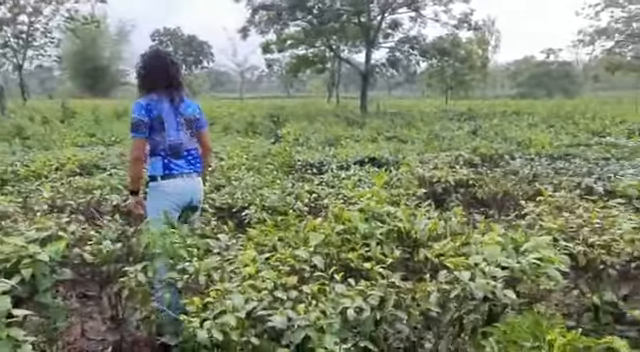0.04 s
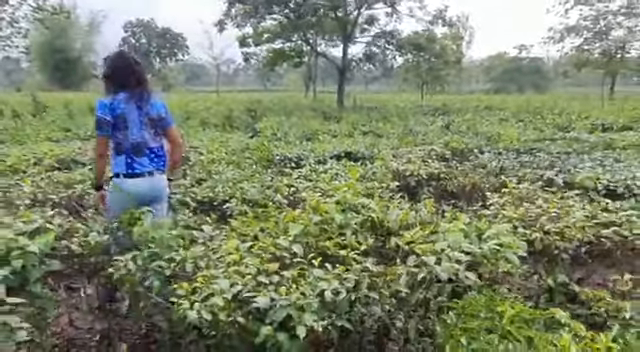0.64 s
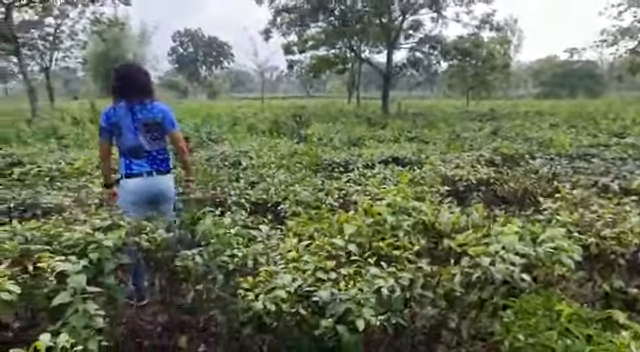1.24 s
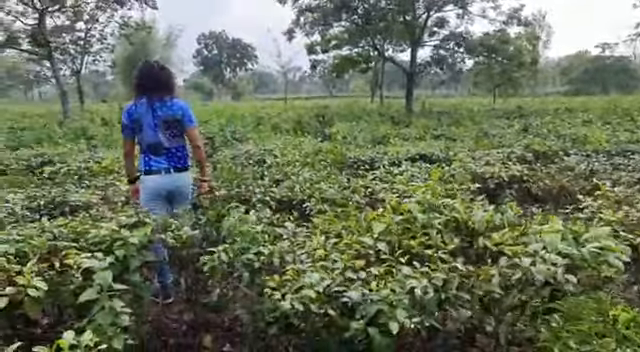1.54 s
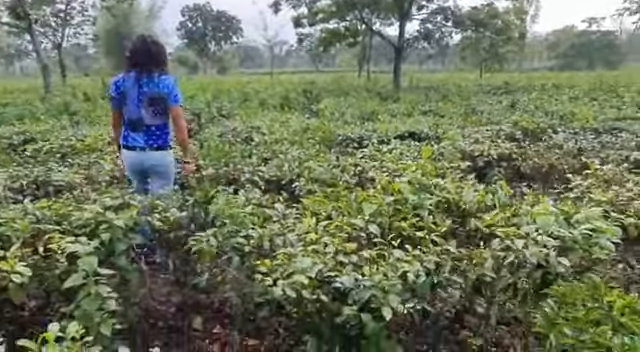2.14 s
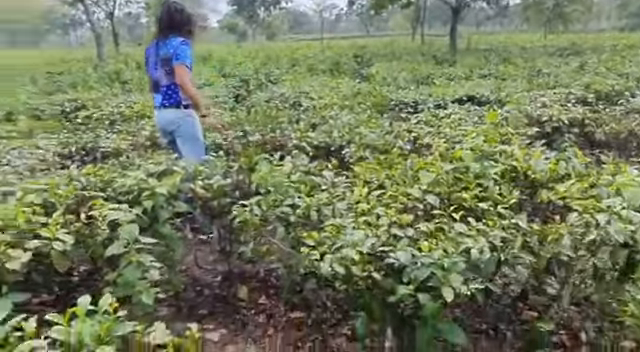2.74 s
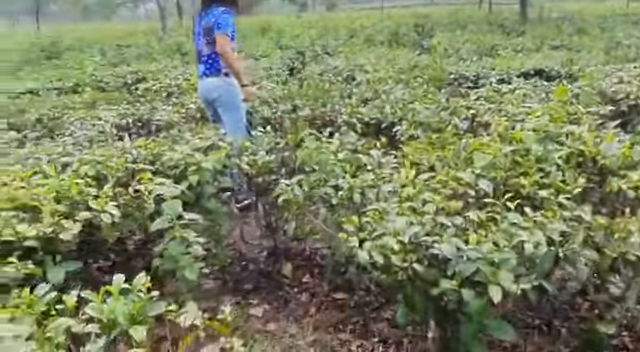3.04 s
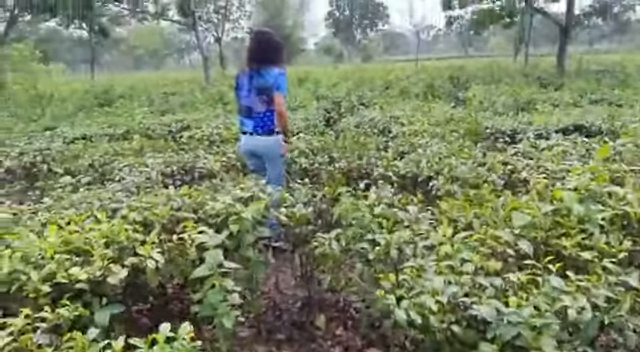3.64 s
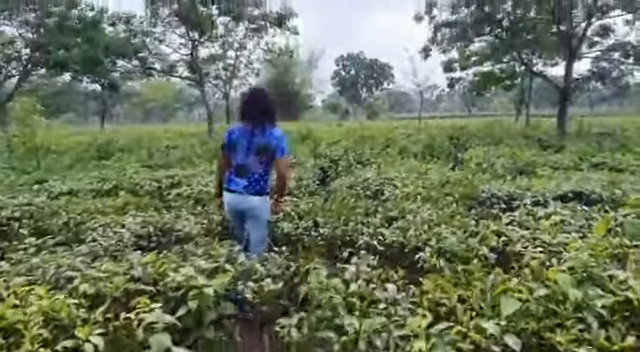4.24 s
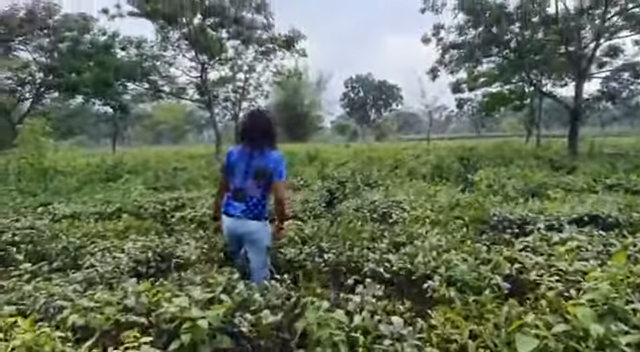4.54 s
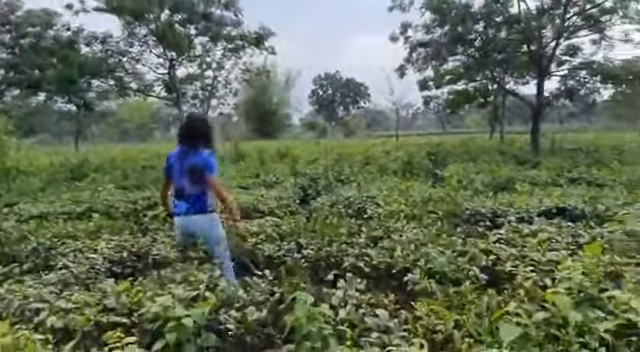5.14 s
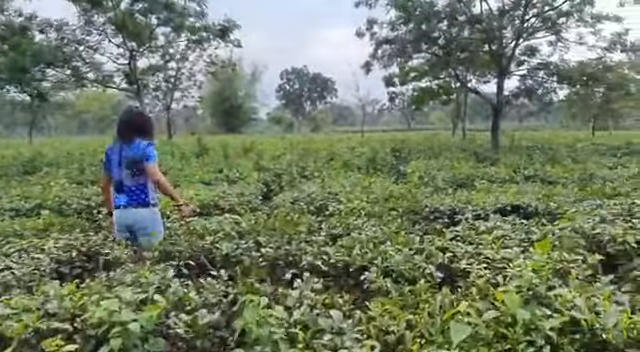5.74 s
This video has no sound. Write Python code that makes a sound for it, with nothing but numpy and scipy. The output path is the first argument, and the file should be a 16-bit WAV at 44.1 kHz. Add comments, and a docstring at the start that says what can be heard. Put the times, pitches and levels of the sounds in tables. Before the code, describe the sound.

Hollow two-note bird calls, scattered chirps and whistles sound in an open garden as a walker brushes leaves and snaps twigs.

```python
"""An open garden of low bushes, where a cuckoo repeats its hollow two-note call in nearly pure tones.
A songbird trills in tiny rising hooks, then whistles two phrases, among burry chirps and nasal calls.
Smaller birds chirp farther off, and trunks and foliage send soft echoes back.
Someone walks through the bushes: leaves rustle, twigs tick and steps thud on soft earth.
Under it all lie outdoor air, a far rumble, a brief insect buzz and a thin, high whine."""
import sys
import numpy as np
from scipy import signal
from scipy.io import wavfile
from scipy.ndimage import uniform_filter1d

SR = 44100
rng = np.random.default_rng(int(sys.argv[2]) if len(sys.argv) > 2 else 0)


def output_pcm(signal):
    """Save a mono or channel-first signal as 16-bit PCM at the path in sys.argv[1].

    Samples are clipped to [-1, 1] before scaling.
    """
    pcm = np.clip(np.atleast_2d(signal).T, -1, 1) * 32767
    wavfile.write(sys.argv[1], SR, np.round(pcm).astype(np.int16))


N = 254898
TIME = np.arange(N) / SR
CUTOFF_HZ = 15950


def from_db(db):
    """Decibels to gain."""
    return 10 ** (np.asarray(db) / 20)


def unit_rms(x):
    """Scale to unit power."""
    return x / np.sqrt(np.mean(x ** 2) + 1e-20)


def automation(rows):
    """Each column of a timed curve at every sample."""
    times, *columns = np.transpose(rows)
    return [np.interp(TIME, times, column) for column in columns]


def at_hz(points, hz):
    """Read a spectrum on a log-frequency axis."""
    freqs, values = np.transpose(points)
    return np.interp(np.log(hz), np.log(freqs), values)


def add(out, start, sound):
    """Mix a sound in at a time in seconds."""
    i = int(round(start * SR))
    sound = sound[..., max(-i, 0):N - i]
    out[..., max(i, 0):max(i, 0) + sound.shape[-1]] += sound


def drift(rate, size=N):
    """Random modulation of spread about 1, gliding to `rate` new values a second."""
    knots = rng.standard_normal(int(size / SR * rate) + 2)
    return np.interp(np.arange(size) / SR * rate, np.arange(len(knots)), knots)


def band(x, low_hz, high_hz):
    """A gentle band-pass."""
    edges = [low_hz, min(high_hz, SR / 2 - 1000)]
    return signal.sosfilt(signal.butter(2, edges, "band", fs=SR, output="sos"), x)


def sine(hz):
    """A tone of unit power that follows a pitch curve."""
    return np.sqrt(2) * np.sin(2 * np.pi * np.cumsum(hz) / SR)


def arc(length, first_hz, middle_hz, last_hz):
    """Pitch bending through three points, and an envelope that swells and fades."""
    u = np.linspace(0, 1, int(length * SR))
    parabola = np.polyfit([0, .5, 1], [first_hz, middle_hz, last_hz], 2)
    return np.polyval(parabola, u), np.sin(np.pi * u)


def contour(rows, glide_s):
    """Pitch and envelope of a note; the bird's muscles round every corner."""
    times, hz, db = np.transpose(rows)
    t = np.arange(times[0], times[-1], 1 / SR)
    size = max(int(glide_s * SR), 1)
    envelope = np.interp(t, times, from_db(db)) * signal.windows.tukey(len(t), .05)
    return uniform_filter1d(np.interp(t, times, hz), size), uniform_filter1d(envelope, size)


def chirps(rows, waver, flutter_db, rate, second_db):
    """Single slurred tones; a fast shake of pitch and level makes them burry."""
    out = np.zeros(N)
    for start, length, first, middle, last, db in rows:
        hz, envelope = arc(length, first, middle, last)
        hz = hz * (1 + waver * drift(rate, len(hz)))
        tone = sine(hz) + from_db(second_db) * sine(2 * hz) * (2 * hz < CUTOFF_HZ)
        add(out, start, from_db(db + flutter_db * drift(rate / 2, len(hz))) * envelope * tone)
    return out


def sing(shape, cues, second_db, third_db, waver, shimmer_db):
    """One note sung at each cue: a never quite steady tone with faint second and third harmonics."""
    out = np.zeros(N)
    for start, db, shift_hz, stretch in cues:
        hz, envelope = contour(np.array(shape) * [stretch, 1, 1], glide_s=.006)
        hz = (hz + shift_hz) * (1 + waver * drift(206, len(hz)))
        tone = sine(hz) + from_db(second_db) * sine(2 * hz) + from_db(third_db) * sine(3 * hz)
        add(out, start, tone * envelope * from_db(db + shimmer_db * drift(160, len(hz))))
    return out


# Stereo image of the beds, narrow lows and wide highs: (frequency [Hz], left-right correlation [0-1])
BED_CORRELATION = [(60, 0.87), (300, 1), (650, 0.99), (1200, 0.68), (3000, 0.62), (6000, 0.16),
                   (10000, 0.11), (15000, .1)]


def noise_bed(spectrum, flicker_db, flicker_rate):
    """Half-octave bands of stereo noise, each flickering by itself; unit power in all."""
    edges = 22 * 2 ** (np.arange(20) / 2 + .3)
    out, white = 0, rng.standard_normal((2, 2, N))
    for k, (low, high) in enumerate(zip(edges, edges[1:])):
        hz = np.sqrt(low * high)
        if spectrum[0][0] < high and low < spectrum[-1][0]:
            mid, side = band(white[k % 2], low, high)
            alike = np.clip(at_hz(BED_CORRELATION, hz), 0, 1)
            gain = from_db(at_hz(spectrum, hz) + flicker_db * drift(flicker_rate))
            out = out + gain * (np.sqrt(1 + alike) * mid + np.sqrt(1 - alike) * side * [[1], [-1]])
    return unit_rms(out)


# Tone colour of the air, the rumble and the bird wash: (frequency [Hz], relative density [dB])
AIR_EQ = [(100, -13.5), (200, 0), (380, -2.5), (560, 8), (720, 5.5), (1100, -5), (2000, -4.5), (3500, -31),
          (7000, -23.5)]
RUMBLE_EQ = [(22, -7.5), (40, -7), (72, -3.5), (110, -6), (170, -23.5), (300, -21.5)]
CHORUS_EQ = [(2000, -1), (3000, 7), (3800, 5), (4800, -7), (6000, -2), (7500, -18.5), (10000, -23)]
# Fader rides of the rumble and the bird wash: (time [s], relative level [dB])
RUMBLE_RIDE = [(0, -46), (.15, -47.5), (.42, -41.5), (.55, -48.5), (1.1, -47.5), (2.7, -46), (3.3, -48.5),
               (4.5, -43.5), (4.8, -48), (5.4, -40.5), (5.78, -44)]
CHORUS_RIDE = [(0, -45), (.7, -42), (1.2, -45), (1.6, -39.5), (1.9, -40.5), (2.55, -36), (2.9, -39),
               (3.3, -41), (3.8, -37), (4.3, -40.5), (4.8, -39.5), (5.3, -38.5), (5.78, -37)]


def ambience(air_db, rumble_trim_db, chorus_trim_db):
    """Open air, a far rumble and distant birds blurred into a wash."""
    rumble_db, = automation(RUMBLE_RIDE)
    chorus_db, = automation(CHORUS_RIDE)
    air = from_db(air_db) * noise_bed(AIR_EQ, flicker_db=1.5, flicker_rate=14)
    rumble = from_db(rumble_db + rumble_trim_db) * noise_bed(RUMBLE_EQ, flicker_db=2.5, flicker_rate=6.5)
    chorus = from_db(chorus_db + chorus_trim_db) * noise_bed(CHORUS_EQ, flicker_db=4, flicker_rate=25)
    return air + rumble + chorus


def whine(hz, level_db, wander_hz, flicker_db):
    """A thin high tone that never stops."""
    return from_db(level_db + flicker_db * drift(35)) * sine(hz + wander_hz * drift(40))


def insect(low_hz, high_hz, level_db, stop_s):
    """A faint dry buzz of narrow noise that soon stops."""
    buzz = unit_rms(band(rng.standard_normal(N), low_hz, high_hz))
    fade_out = np.clip((stop_s - TIME) * 10, 0, 1)
    return from_db(level_db + 2 * drift(50)) * buzz * fade_out


def tree_reverb(x, t60, build_s, width):
    """Trunks and foliage scatter many small echoes that build up and die away."""
    t = np.arange(SR) / SR
    echoes = rng.standard_normal((2, SR)) * from_db(-60 * t / t60) * (1 - np.exp(-t / build_s))
    mid, side = echoes / np.sqrt(np.sum(echoes ** 2, axis=1, keepdims=True))
    response = mid + width * side * np.array([[1], [-1]])
    return signal.fftconvolve(x[None], response, axes=1)[:, :N]


# Slapback from single trees and the far tree line: (delay [s], mean gain [dB])
ECHO_TAPS = [(.105, -29), (.255, -36), (.285, -40.5), (.5, -39.5)]


def far_echoes(x, sway_db):
    """Separate late returns, each fading in and out with the moving air."""
    out = np.zeros(N)
    for delay, db in ECHO_TAPS:
        add(out, delay, x * from_db(db + sway_db * drift(34)))
    return out


# Activity of a far flock: (time [s], density [slurs/s], relative level [dB])
FLOCK_RIDE = [(0, 3, -40.5), (.8, 8, -46), (1.5, 25.6, -48), (1.8, 110, -41), (2.6, 110, -43.5),
              (2.9, 15, -41), (3.6, 6, -55), (5.78, 4, -38.5)]


def flock(centre_hz, spread, sweep, length_s):
    """Twitter of quick slurs, up or down, scattered at random in time, pitch and length."""
    per_s, db = automation(FLOCK_RIDE)
    onsets = np.flatnonzero(rng.random(N) < per_s / SR)
    slurs = []
    for i, (height, slope, span) in zip(onsets, rng.uniform(-1, 1, (len(onsets), 3))):
        hz = centre_hz * np.exp(spread * height)
        bend = np.exp(sweep * slope)
        slurs.append((i / SR, length_s * 2 ** (span / 2), hz * bend, hz, hz / bend, db[i]))
    return chirps(slurs, waver=.025, flutter_db=6.5, rate=460, second_db=-36)


# Far calls, by gesture: (time [s], length [s], middle pitch [Hz], relative level [dB])
THIN_PEEPS = [(.47, 0.16, 6980, -47.5), (.635, 0.12, 6190, -39.5), (.76, 0.14, 6040, -43),
              (.98, 0.14, 7170, -43), (1.03, 0.1, 5340, -42), (1.12, 0.21, 7140, -43),
              (1.3, 0.16, 7120, -42), (1.48, .13, 7020, -42.5), (1.51, 0.048, 2880, -34),
              (2.3, 0.027, 9630, -41), (2.66, 0.23, 7620, -45.5), (3.47, 0.098, 2974, -32),
              (5.295, 0.033, 4730, -41), (5.49, 0.052, 4660, -40.5), (5.71, .05, 4700, -37)]
UPSWEEPS = [(1.27, 0.097, 5340, -41.5), (1.91, .076, 5060, -35.5), (2.11, .063, 5270, -36.5),
            (2.47, .076, 5390, -31), (2.6, .075, 4650, -36)]
QUICK_DROPS = [(.805, 0.037, 4670, -38), (1.17, 0.04, 6350, -39), (1.385, 0.062, 4780, -39.5),
               (1.445, 0.061, 5920, -39), (1.605, 0.08, 4510, -36.5), (1.725, 0.061, 5230, -35),
               (1.775, 0.044, 4540, -35), (2.055, 0.072, 4000, -34), (2.25, 0.028, 5300, -34),
               (2.275, 0.094, 4570, -33.5)]
SOFT_ARCHES = [(1.6, 0.048, 5920, -38.5), (1.78, .11, 5850, -36), (2.9, 0.13, 3720, -40.5),
               (3.13, 0.053, 3730, -38), (3.29, 0.061, 3700, -35.5), (3.495, 0.091, 3670, -39),
               (3.825, 0.084, 2387, -26), (4.06, 0.097, 1984, -37.5), (4.25, 0.064, 2490, -28)]
# A sinking whistle: (time in note [s], pitch [Hz], relative level [dB])
SINK_SHAPE = [(0, 3700, -21), (.04, 3327, -7.5), (.09, 3083, -11), (.14, 2959, -0.5), (.2, 2900, -4),
              (.245, 2840, -10)]
# Its cues: (time [s], relative level [dB], pitch shift [Hz], time stretch [ratio])
SINK_CUES = [(1.009, -32.5, 1.5, 0.95), (1.336, -30.5, -11, 0.68), (1.766, -30.5, 52, 0.87),
             (2.141, -32, 37.5, 0.85)]


def far_birds():
    """Small birds slur short calls, each kind with its own bend; one repeats a sinking whistle."""
    # each kind's first and last pitch, as shares of its middle pitch
    kinds = [(THIN_PEEPS, .95, .92), (UPSWEEPS, .69, 1.29), (QUICK_DROPS, 1.2, 1), (SOFT_ARCHES, .9, .91)]
    slurs = [(start, length, hz * first, hz, hz * last, db)
             for cues, first, last in kinds for start, length, hz, db in cues]
    calls = chirps(slurs, waver=.013, flutter_db=3, rate=500, second_db=-44)
    return calls + sing(SINK_SHAPE, SINK_CUES, second_db=-25, third_db=-42, waver=.0039, shimmer_db=1)


def crinkle(per_s, spread_db):
    """Single leaves flick: tiny dry clicks of uneven size, scattered left and right."""
    sizes = from_db(spread_db * np.minimum(rng.exponential(1, N), 5)) * rng.standard_normal((2, N))
    clicks = sizes * (rng.random(N) < per_s / SR)
    return unit_rms(band(clicks, 3100, 16500))


# Tone colour of the rustle: (frequency [Hz], relative density [dB])
LEAF_EQ = [(1500, 6.5), (4000, -0.5), (7000, 0.5), (9000, -13), (12000, -8), (16000, -7.5)]
# Brushes against the bushes: (peak time [s], time to fall by fade_db [s], relative level [dB])
BRUSH_CUES = [(.01, 0.29, -43.5), (.4, 0.24, -45), (.78, 0.08, -55), (1.27, 0.068, -49),
              (1.9, 0.097, -40.5), (2.55, 0.4, -47.5), (3.079, 0.42, -43), (3.6, 0.071, -46),
              (3.8, 0.43, -44), (4.122, .1, -40.5), (4.41, 0.13, -40), (4.76, .2, -47), (5.11, 0.13, -45.5),
              (5.43, 0.16, -42), (5.75, 0.082, -41.5)]


def leaves(trim_db, rest_db, fade_db, rise_share):
    """The walker brushes through leaves: each rustle swells quickly and dies away more slowly."""
    power = from_db(rest_db) ** 2
    for peak_s, fade_s, db in BRUSH_CUES:
        from_peak = np.maximum(TIME - peak_s, (peak_s - TIME) / rise_share) / fade_s
        power = power + from_db(db - fade_db * np.minimum(from_peak, 10)) ** 2
    envelope = np.sqrt(power) * from_db(trim_db + 2.4 * drift(45))
    hiss = noise_bed(LEAF_EQ, flicker_db=2.3, flicker_rate=60)
    return envelope * (hiss + from_db(-6) * crinkle(per_s=1200, spread_db=2.5))


# Footsteps: (time [s], length [s], first pitch [Hz], last pitch [Hz], thud [dB], scuff [dB])
STEP_CUES = [(1.215, 0.082, 87, 69.6, -34.5, -47.5), (1.443, 0.052, 80, 68, -34, -57),
             (2.412, 0.071, 229.4, 144, -31.5, -33)]


def footsteps():
    """Dull steps on soft earth: each a sinking thud with a low scuff."""
    out = np.zeros(N)
    for start, length, first_hz, last_hz, thud_db, scuff_db in STEP_CUES:
        hz, envelope = arc(length, first_hz, np.sqrt(first_hz * last_hz), last_hz)
        scuff = unit_rms(band(rng.standard_normal(len(hz)), 160, 320))
        add(out, start, envelope * (from_db(thud_db) * sine(hz) + from_db(scuff_db) * scuff))
    return out


# Leaves and twigs snapping: (time [s], relative level [dB], gain of the body under the crack [dB])
SNAP_CUES = [(0.401, -31, -0.5), (0.775, -34, -8), (3.1846, -21, -11), (3.2875, -26.5, -2),
             (4.1137, -14, -3), (4.347, -29, -5), (4.387, -30, -4), (4.4445, -21, -6)]


def twigs(snap_s, tail_s, tail_db, trim_db, pan_db):
    """Each snap is a quickly swelling crack followed by a short shiver of leaves."""
    out, t = np.zeros((2, N)), np.arange(SR // 10) / SR
    attack = 1 - np.exp(-t / .001)
    envelope = attack * (np.exp(-t / snap_s) + from_db(tail_db) * np.exp(-t / tail_s))
    for start, db, body_db in SNAP_CUES:
        crack, body = rng.standard_normal((2, 2, len(t)))
        centred_body = band(body + body[::-1], 1500, 7700)
        burst = band(crack, 9200, 21050) + from_db(body_db) * centred_body
        add(out, start, from_db(db + trim_db) * burst * envelope)
    return out * from_db([[pan_db], [-pan_db]])


# Nasal calls: (time [s], length [s], first, middle and last pitch [Hz], relative level [dB])
NASAL_CUES = [(2.748, 0.081, 1240, 1167, 1106, -29), (3.088, 0.037, 1303, 1390, 1430, -39),
              (3.128, 0.09, 1586, 1556, 1610, -38), (3.312, 0.07, 1240, 1180, 1195, -30.5),
              (3.86, 0.068, 1500, 1584, 1560, -34.5), (4.053, 0.08, 1263, 1150, 1130, -33)]
# Resonance of the bird's throat: (frequency [Hz], gain [dB])
THROAT_EQ = [(2400, -22), (3600, -9), (4800, -7.5), (6000, 6), (7200, -6), (8400, -9), (9500, -17),
             (11000, -37)]


def nasal_bird(waver, trim_db, rasp_db):
    """A buzz whose high overtones pass the throat; uneven cycles put weaker lines between them."""
    out = np.zeros(N)
    for start, length, first, middle, last, db in NASAL_CUES:
        hz, envelope = arc(length, first, middle, last)
        hz = hz * (1 + waver * drift(495, len(hz)))
        buzz = sum(from_db(at_hz(THROAT_EQ, k * hz / 2) + rasp_db * (k % 2)) * sine(k * hz / 2)
                   for k in range(4, 17))
        add(out, start, from_db(db + trim_db) * envelope * unit_rms(buzz))
    return out


# Burry chirps: (time [s], length [s], first, middle and last pitch [Hz], level [dB])
BURR_CUES = [(2.505, 0.05, 3060, 2620, 2170, -32), (2.755, 0.065, 2840, 2840, 2340, -30),
             (3.183, 0.036, 11800, 11700, 11900, -41), (3.365, .072, 3000, 2746, 2400, -29),
             (3.595, 0.057, 2930, 2650, 2210, -29.5)]


def burry_bird():
    """Short, close chirps, roughened by a deep, fast shake of pitch."""
    return chirps(BURR_CUES, waver=.043, flutter_db=4, rate=600, second_db=-22)


# Trill runs: (first hook [s], last hook [s], hooks [count], first pitch [Hz], last pitch [Hz],
# sweep either side of the pitch [Hz], mid-run level [dB])
TRILL_RUNS = [(2.879, 2.926, 4, 3000, 2836, 130, -25.5), (2.967, 3.17, 13, 2854, 3002, 110, -25.5),
              (3.705, 3.753, 4, 2770, 2650, 170, -27), (3.814, 4.175, 23, 2704, 2930, 180, -23.5)]


def songbird_trill(hook_s, bend_hz, waver, edge_db, uneven_db):
    """About sixty tiny rising hooks a second; each run glides in pitch, swells and fades."""
    out = np.zeros(N)
    for first_s, last_s, count, first_hz, last_hz, sweep_hz, run_db in TRILL_RUNS:
        for u in np.linspace(0, 1, count):
            pitch = first_hz + (last_hz - first_hz) * u
            db = run_db + edge_db * (2 * u - 1) ** 2 - uneven_db * rng.standard_normal()
            hz, envelope = arc(hook_s, pitch - sweep_hz, pitch + bend_hz, pitch + sweep_hz)
            hz = hz * (1 + waver * drift(800, len(hz)))
            add(out, first_s + (last_s - first_s) * u, from_db(db) * envelope * sine(hz))
    return out


# A warble (two flicks into high holds, then a low hold) and the falling slur that answers it:
# (time in note [s], pitch [Hz], relative level [dB])
WARBLE_SHAPE = [(0, 2510, 8), (.006, 2990, -2), (.012, 2520, -2.5), (.026, 2992, -0.5), (.064, 2934, -1.5),
                (.076, 2220, -7), (.086, 2700, -1.5), (.096, 2230, -5.5), (.114, 2938, -0.5),
                (.156, 2990, -1), (.163, 2504, 1.5), (.193, 2437, -1.5), (.222, 2453, -12)]
FALL_SHAPE = [(0, 2735, -26), (.01, 3330, -6.5), (.02, 3393, -4), (.038, 3130, -8), (.055, 2820, 0),
              (.08, 2620, -1.5), (.11, 2515, -6), (.12, 2450, -18)]
# Their cues: (time [s], relative level [dB], pitch shift [Hz], time stretch [ratio])
WARBLE_CUES = [(4.462, -23, -6.5, 1.005), (5.227, -22.5, 9.5, 1.05)]
FALL_CUES = [(4.766, -21.5, 63.5, 0.94), (5.533, -20.5, -47.5, 1)]


def songbird_whistle():
    """Two phrases of clear, quickly gliding whistles: a warble, then a falling slur."""
    warble = sing(WARBLE_SHAPE, WARBLE_CUES, second_db=-36.5, third_db=-51, waver=.0053, shimmer_db=2)
    fall = sing(FALL_SHAPE, FALL_CUES, second_db=-29.5, third_db=-54, waver=.007, shimmer_db=2.5)
    return warble + fall


# The arched "cuck" and the level "coo": (time in note [s], pitch [Hz], relative level [dB])
CUCK_SHAPE = [(0, 530, -30), (.01, 632, -9), (.02, 686, -2.5), (.03, 703, -.5), (.04, 686, 0),
              (.05, 670, 0), (.06, 648, -.5), (.07, 603, -4.5), (.08, 556, -9.5), (.092, 530, -32)]
COO_SHAPE = [(0, 515, -32), (.012, 526, -9), (.025, 535, -2), (.06, 535, -.4), (.085, 538, 0),
             (.12, 540, -.9), (.137, 537, -3), (.15, 523, -10), (.162, 515, -30)]
# Their cues, one coo only a faint, short afterthought:
# (time [s], relative level [dB], pitch shift [Hz], time stretch [ratio])
CUCK_CUES = [(-.026, -8.5, 7, 1.197), (1.86, -9, 0.5, 1), (3.555, -8.5, -8.5, 1.003),
             (5.06, -7.5, 1, 1.015)]
COO_CUES = [(.29, -5.5, 0, 0.98), (.622, -32.5, 1, 0.32), (2.192, -5.5, -1.5, 0.99),
            (3.882, -5, -0.5, 0.96), (5.371, -4.5, 2, 1)]


def cuckoo():
    """Two hollow, nearly pure notes, the second lower and steadier."""
    cuck = sing(CUCK_SHAPE, CUCK_CUES, second_db=-29, third_db=-38, waver=.0074, shimmer_db=.25)
    coo = sing(COO_SHAPE, COO_CUES, second_db=-42, third_db=-43.5, waver=.0011, shimmer_db=.25)
    return from_db(-1.5) * cuck + from_db(-2.5) * coo


def scene():
    """All birds sit straight ahead; the farther they are, the more of them arrives by way of the trees."""
    lead = cuckoo()
    near = songbird_whistle()
    near += songbird_trill(hook_s=.016, bend_hz=20.8, waver=.02, edge_db=-3.5, uneven_db=.5)
    near += burry_bird()
    near += nasal_bird(waver=.016, trim_db=-2, rasp_db=-13.5)
    far = far_birds()
    twitter = flock(centre_hz=4730, spread=.22, sweep=.22, length_s=.045)   # heard only as reverb
    echoes = from_db(-21) * tree_reverb(lead, t60=.64, build_s=.0059, width=.079)
    echoes += far_echoes(lead, sway_db=6.5)
    echoes += from_db(-10.5) * tree_reverb(near, t60=.88, build_s=.002, width=.32)
    echoes += from_db(-5) * tree_reverb(far + twitter, t60=.41, build_s=.0013, width=.44)
    walker = twigs(snap_s=.0043, tail_s=.015, tail_db=-15, trim_db=1.5, pan_db=2.5) + footsteps()
    bed = ambience(air_db=-37.5, rumble_trim_db=2.5, chorus_trim_db=-2)
    bed += leaves(trim_db=4.5, rest_db=-56, fade_db=13.5, rise_share=.63)
    bed += insect(low_hz=4340, high_hz=5020, level_db=-46, stop_s=.673)
    bed += whine(hz=8738, level_db=-49, wander_hz=7, flicker_db=2)
    return lead + near + from_db(-4) * far + echoes + walker + bed


def record(dry):
    """A steep low-pass cuts the very top."""
    return signal.sosfilt(signal.ellip(12, .1, 90, CUTOFF_HZ, fs=SR, output="sos"), dry)


dry = scene()
out = record(dry)
output_pcm(out)
```